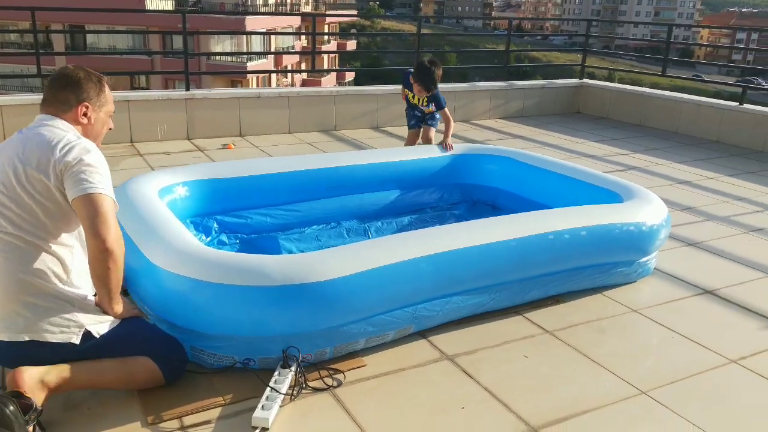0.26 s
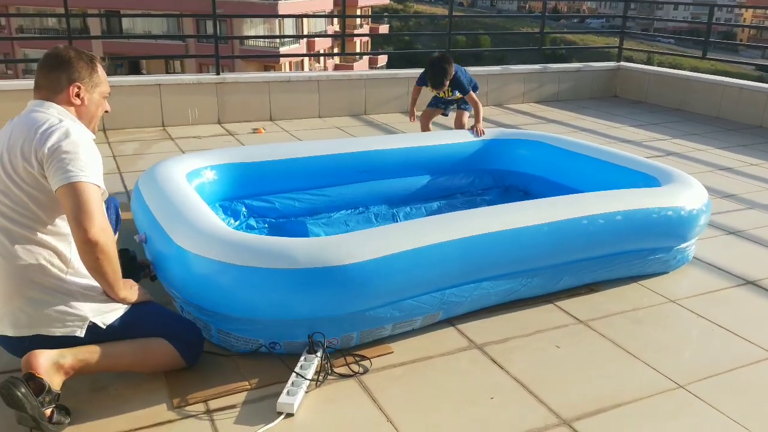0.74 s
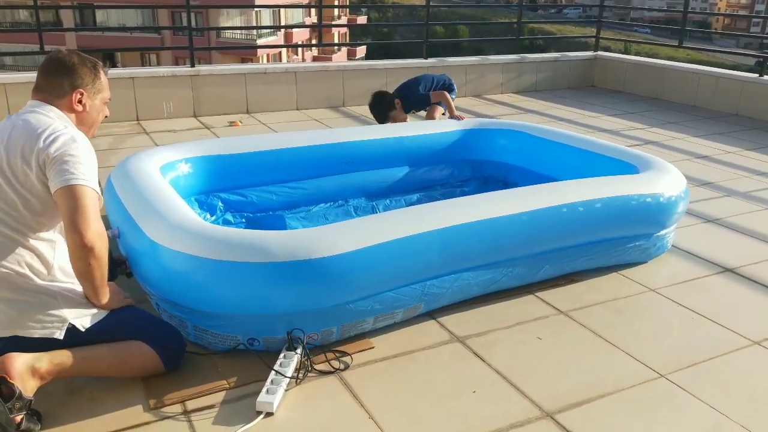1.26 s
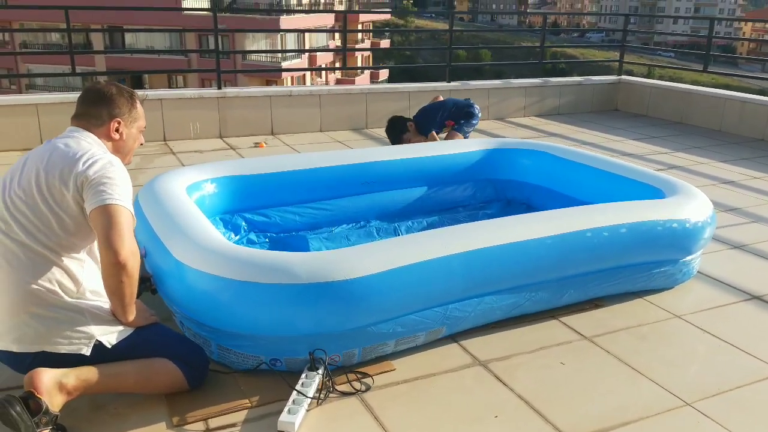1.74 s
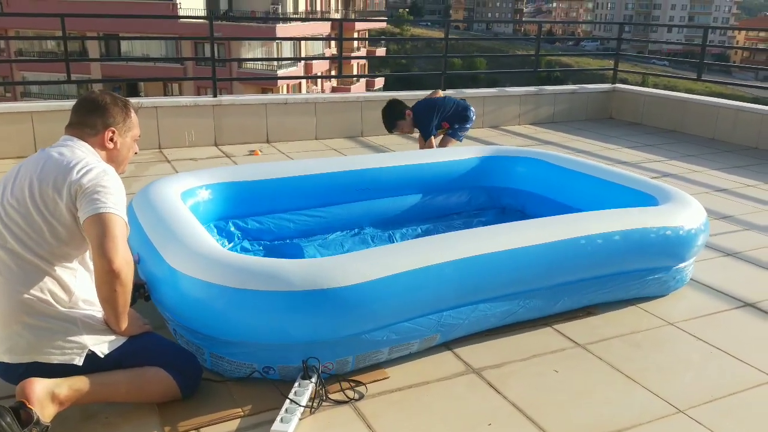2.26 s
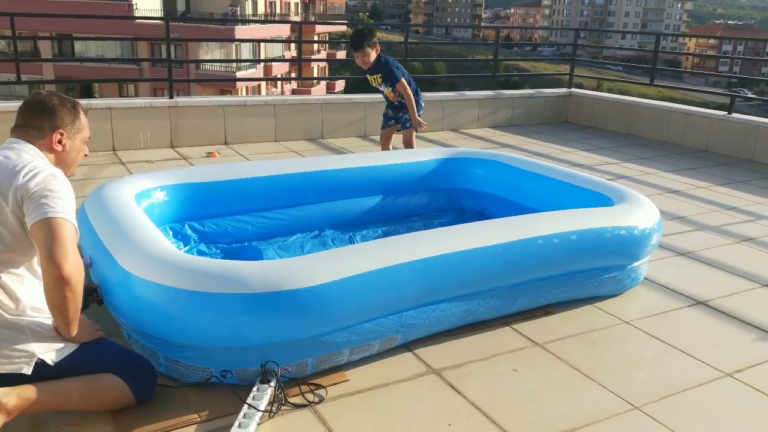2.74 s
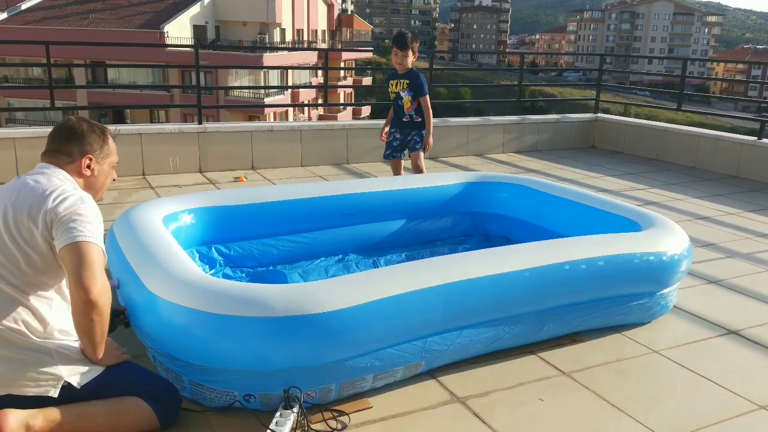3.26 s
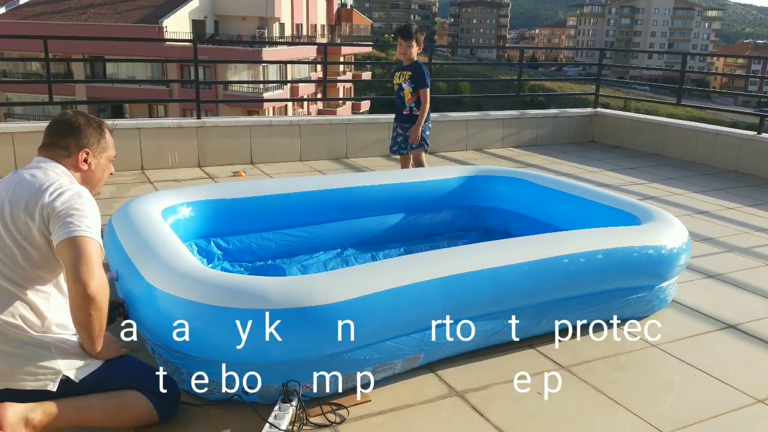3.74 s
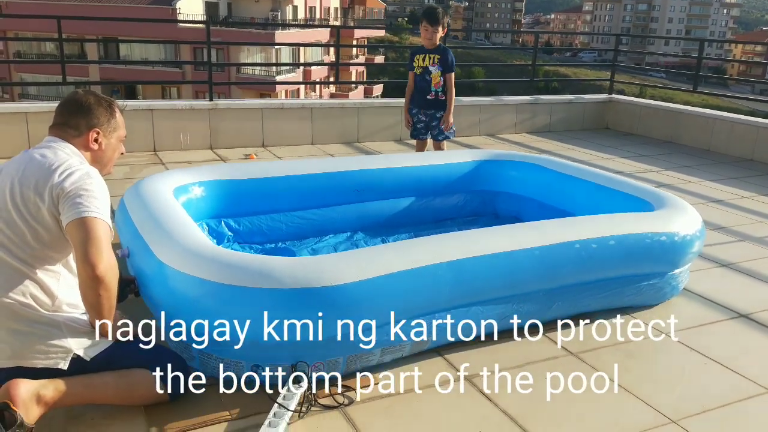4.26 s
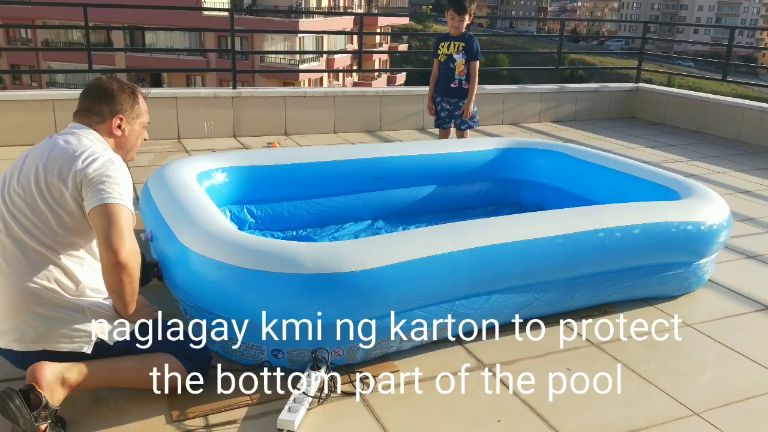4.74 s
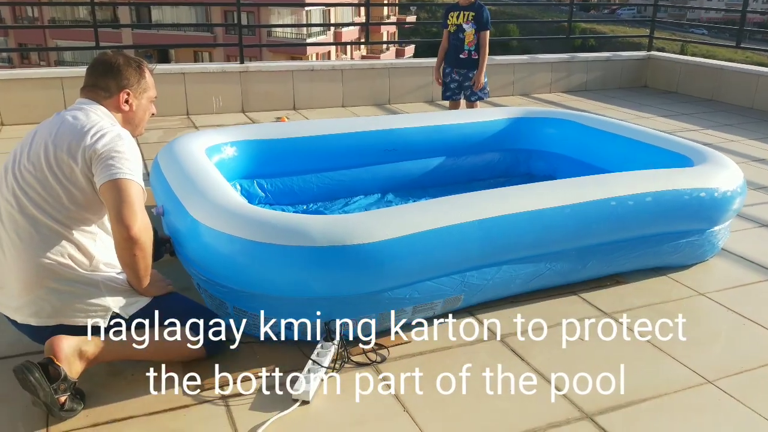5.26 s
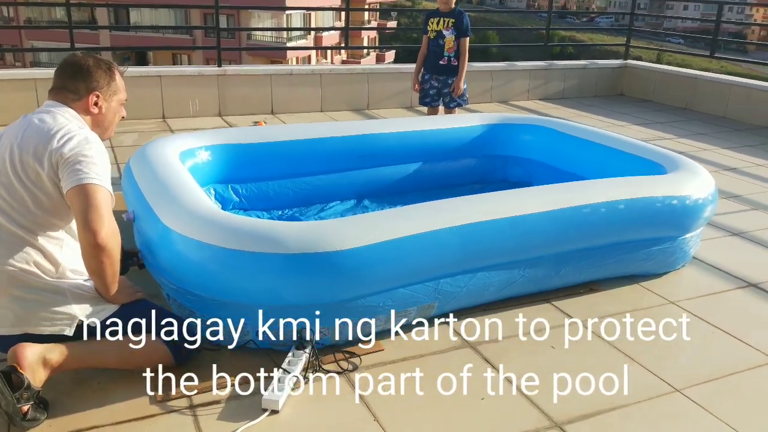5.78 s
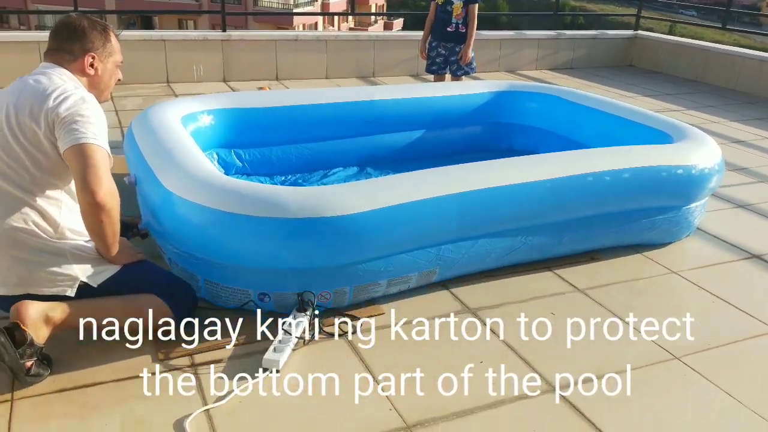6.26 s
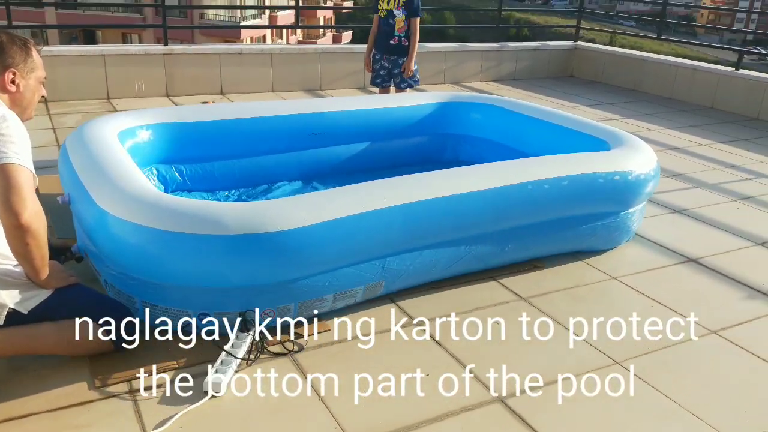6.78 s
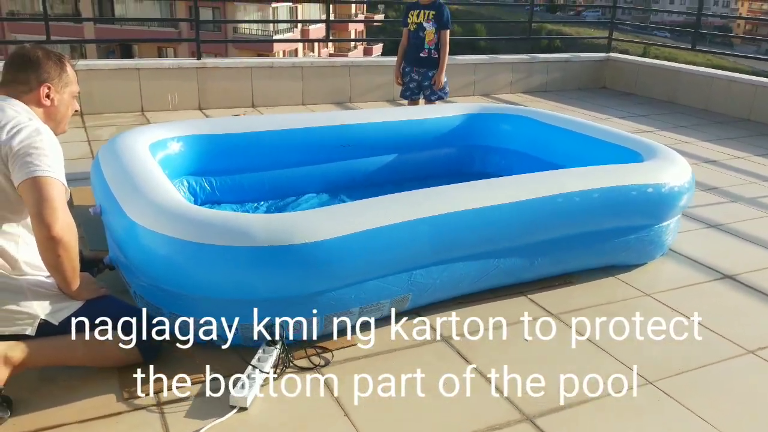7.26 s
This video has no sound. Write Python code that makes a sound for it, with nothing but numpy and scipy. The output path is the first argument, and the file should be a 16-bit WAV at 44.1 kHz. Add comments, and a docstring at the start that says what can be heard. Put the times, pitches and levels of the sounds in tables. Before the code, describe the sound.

An electric inflator runs without pause on an open terrace: low motor hum, piercing blade whine around three kilohertz, and rushing, hissing air. The whine swells and dips separately left and right as the handheld stereo microphone drifts. A soft vinyl knock comes early, then a sharp thump on the left microphone before midway; later the low rumble rises slightly.

```python
"""Open terrace, hand-held camera with two microphone ports: an electric air pump fills an inflatable pool.
From the start, sines at shaft orders hum, the ten-blade impeller whines and shaped noise rushes through pump,
hose and nozzle; the camera drifts through standing waves, so the whine swells and fades at each port.
At 1.2 s damped modes give a soft pool knock and low ring; at 2.87 s something bumps the left port, with two
rebounds, and the pool rings. A short low ring follows at 5.39 s; from 5.57 s the rumble steps up and stays."""
import sys
import numpy as np
from scipy import signal
from scipy.fft import rfft, irfft, next_fast_len
from scipy.io import wavfile
from scipy.ndimage import uniform_filter1d, map_coordinates

SR = 44100
rng = np.random.default_rng(int(sys.argv[2]) if len(sys.argv) > 2 else 0)


def dump_mix(stems):
    """Bounce the given channels to the path in sys.argv[1] as a 16-bit WAV at rate SR."""
    frames = np.atleast_2d(stems).T  # one column per channel
    limited = np.clip(frames, -1, 1)  # hard clip at full scale
    pcm = np.round(limited * 32767).astype(np.int16)
    wavfile.write(sys.argv[1], SR, pcm)


N = 331632  # samples, 7.52 s


def amp(db):
    """Decibels to gain."""
    return 10 ** (np.asarray(db) / 20)


def unit(x):
    """Scale to rms 1."""
    return x / np.sqrt(np.mean(x ** 2) + 1e-20)


def along(points, hz):
    """Read (Hz, value) points on a log frequency axis."""
    point_hz, value = np.transpose(points)
    return np.interp(np.log(hz + 1), np.log(point_hz + 1), value)


def curves(rows):
    """One value per sample for each column after the time."""
    time_s, *columns = np.transpose(rows)
    return [np.interp(np.arange(N) / SR, time_s, column) for column in columns]


def wobble(rate):
    """A smooth random curve, rate knots a second."""
    knots = rng.standard_normal(int(N * rate / SR) + 4)
    return map_coordinates(knots, [np.arange(N) * rate / SR])


def filtered(x, response):
    """x times a complex response of frequency."""
    size = next_fast_len(N + SR // 2)
    spectrum = rfft(x, size) * response(np.fft.rfftfreq(size, 1 / SR))
    return irfft(spectrum, size)[..., :N]


def pan(left_db):
    """Gains of the two ports for a left-right level difference."""
    return amp([[left_db / 2], [-left_db / 2]])


def tone(phase):
    """A sine of rms 1."""
    return np.sqrt(2) * np.sin(phase)


# Motor speed before its quick waver: time_s, shaft_hz
SHAFT_SPEED = [(0, 317.9), (.9, 318.9), (1.35, 318.8), (1.6, 318.5), (2.7, 318.35), (3.4, 318.65),
               (4.1, 318.75), (5.2, 319.15), (6.4, 319.5), (7.52, 319.3)]


def shaft_angle(waver_hz):
    """The shaft turns with a slight quick waver of speed; its angle in radians drives hum and whine."""
    shaft_hz = curves(SHAFT_SPEED)[0] + waver_hz * wobble(25.4)
    return 2 * np.pi * np.cumsum(shaft_hz) / SR


# Shaft hum reference, fading slowly until the camera comes lower: time_s, level_db (before a trim)
HUM_LEVEL = [(0, -41.5), (1.4, -44), (5.8, -45), (6.2, -42.5), (7.52, -44)]
# Shaft orders: multiple_of_shaft, level_db (against the hum), left_right_db, change_db (start to end)
SHAFT_ORDERS = [(1, -1.5, 4, -2), (2, -15, 10.5, -0.5), (3, -12.5, 3, -6), (5, -11, -3, -3),
                (7, -16, 9, -6), (11, -51, -4, 0), (12, -19, 0, 1)]


def motor(angle, flutter_db, trim_db=-1.5):
    """Unbalance hums once a turn, with weaker orders above it."""
    hum_db = curves(HUM_LEVEL)[0]
    progress = np.linspace(-.5, .5, N)
    out = np.zeros((2, N))
    for multiple, db, left_db, change_db in SHAFT_ORDERS:
        level_db = hum_db + db + change_db * progress + trim_db + flutter_db * wobble(22)
        start_phase = rng.uniform(0, 2 * np.pi)
        out += amp(level_db) * pan(left_db) * tone(round(multiple) * angle + start_phase)
    return out


def two_ports(left, right, lead):
    """Level and phase of a tone at both ports; the port nearer to a node takes most of the phase slip."""
    gain = amp(np.array(curves(left) + curves(right)))
    lead_rad = curves(lead)[0]
    left_share = gain[1] ** 2 / np.sum(gain ** 2, axis=0)
    left_phase = np.cumsum(np.diff(lead_rad, prepend=0) * left_share)
    return gain, np.array([left_phase, left_phase - lead_rad])


BLADES = 10
# Blade tone in the standing waves at the left port: time_s, level_db (before trim and flutter)
BLADE_TONE_LEFT = [(0, -38), (.15, -42), (.2, -55), (.27, -46), (.42, -34), (.58, -27), (.7, -24.5),
                   (.87, -31), (1.02, -26.5), (1.25, -31), (1.44, -37), (1.62, -30.5), (1.86, -25.8),
                   (1.94, -29), (2.03, -56), (2.1, -42), (2.17, -37), (2.23, -42.5), (2.42, -34),
                   (2.55, -40.5), (2.72, -34), (2.95, -33), (3.25, -41.5), (3.45, -33.5), (3.8, -36.5),
                   (4.17, -41), (4.3, -55), (4.36, -41), (4.75, -31.5), (5, -28.5), (5.26, -38.5),
                   (5.45, -36), (5.54, -46), (5.6, -38), (6.3, -32.5), (6.72, -40.5), (7.02, -41.5),
                   (7.13, -54), (7.2, -42.5), (7.43, -32.5), (7.52, -35)]
# Blade tone at the right port: time_s, level_db (before trim and flutter)
BLADE_TONE_RIGHT = [(0, -35), (.1, -30.5), (.4, -41), (.5, -40), (.58, -53), (.66, -34.5), (.8, -37),
                    (.88, -56), (.95, -35.5), (1.08, -29.5), (1.42, -37.5), (1.6, -40.5), (1.73, -29.3),
                    (1.85, -31), (1.94, -37), (2.06, -31), (2.25, -40), (2.39, -31.5), (2.9, -34),
                    (2.97, -43), (3.24, -35.5), (3.43, -42.5), (3.65, -36), (3.88, -37), (4.14, -38),
                    (4.25, -51), (4.36, -39.5), (4.58, -39.5), (4.7, -54), (5, -41), (5.23, -46),
                    (5.46, -35), (5.73, -37.5), (6.1, -28.5), (6.4, -36), (6.59, -55), (6.72, -41.5),
                    (6.8, -49), (6.88, -41), (7, -40.5), (7.06, -48), (7.3, -42), (7.52, -42)]
# How the whine's wave crosses the ports as the camera drifts: time_s, left_lead_rad (before scatter)
BLADE_TONE_LEAD = [(0, -3), (.16, -3.2), (.22, -7.4), (.6, -2.3), (.86, -.5), (.9, -2.8), (1.1, -2.6),
                   (1.29, -3.1), (1.43, -3.15), (1.6, -2.1), (1.78, -3), (2.1, -1), (2.27, 1.4),
                   (2.36, 1.7), (2.43, 3), (2.55, 1), (2.75, .1), (3.2, .5), (3.53, 1.4), (3.65, 2.8),
                   (3.78, 3.15), (3.91, 3.2), (4.08, 4.6), (4.28, 5.3), (4.33, 3.3), (4.5, 4.1), (4.7, 2),
                   (4.87, 1.4), (4.93, 3.7), (5.05, 4.6), (5.2, 2.5), (5.37, 1.6), (5.42, 3.1), (5.46, 3.1),
                   (5.62, -.2), (5.78, -.1), (6.05, -2.7), (6.3, -1.4), (6.5, -1.8), (6.62, -4.5),
                   (6.74, -3.1), (6.85, -.2), (7.1, -.2), (7.15, -2), (7.52, -3.5)]
# Thin side tones riding on the whine: above_blade_tone_hz, level_db (against it, before flutter)
SIDE_TONES = [(1405, -36), (3889, -25), (5200, -45), (5297, -33), (7779, -29.5), (9092, -42.5),
              (9186, -35.5)]
# Octave of the blade tone at the left port: time_s, level_db (before trim and flutter)
BLADE_OCTAVE_LEFT = [(0, -46), (.35, -68), (1.3, -53), (2.35, -49), (2.6, -55), (2.97, -55), (3.3, -62),
                     (3.9, -50), (4.33, -50), (4.65, -54), (4.87, -84), (5.1, -57), (6.7, -62),
                     (6.93, -51.5), (7.2, -47), (7.4, -72)]
# The octave at the right port: time_s, level_db (before trim and flutter)
BLADE_OCTAVE_RIGHT = [(0, -54), (1.05, -47), (1.4, -77), (1.9, -65), (2.23, -57), (2.7, -66), (3.4, -46),
                      (3.9, -58), (4.68, -50), (4.85, -43.5), (5.18, -41), (5.48, -53), (5.78, -43),
                      (6.12, -70), (6.4, -41.5), (6.78, -50), (7.08, -40), (7.38, -47), (7.52, -42)]
# How the octave's wave crosses the ports: time_s, left_lead_rad
BLADE_OCTAVE_LEAD = [(4.8, -3.1), (5, -.4), (5.75, -.7), (6.05, -2.5), (6.6, -3.6), (6.9, -2), (7.2, -1.7),
                     (7.45, -2.9)]


def impeller(angle, whine_db, flutter_db, scatter, thin_rough, octave_db, octave_flutter_db):
    """Blades chop the air into a whine; tiles and wall reflect it, so each port passes its own sharp nodes."""
    t = np.arange(N) / SR
    ports = lambda rate: np.array([wobble(rate), wobble(rate)])  # independent at the two ports

    gain, phase = two_ports(BLADE_TONE_LEFT, BLADE_TONE_RIGHT, BLADE_TONE_LEAD)
    level = gain * amp(whine_db + flutter_db * wobble(34))
    blade_phase = BLADES * angle + phase + scatter * ports(140)
    thin = np.zeros((2, N))
    for above_hz, db in SIDE_TONES:
        thin_level = amp(db + 1.7 * wobble(18))
        thin_phase = blade_phase + 2 * np.pi * above_hz * t + thin_rough * ports(320)
        thin += thin_level * tone(thin_phase)

    gain, phase = two_ports(BLADE_OCTAVE_LEFT, BLADE_OCTAVE_RIGHT, BLADE_OCTAVE_LEAD)
    octave_level = gain * amp(octave_db + octave_flutter_db * ports(5.7))
    octave = octave_level * tone(2 * BLADES * angle + phase)
    return level * (tone(blade_phase) + thin) + octave


# Likeness of the air noise at the two ports: frequency_hz, coherence (0 to 1)
PORT_COHERENCE = [(50, 0.97), (300, 1), (700, 0.34), (1400, 0.55), (2200, 0.24), (3500, 0.1), (6000, 0.064),
                  (12000, 0.097)]


def rush(spectrum, lag_ms, patchy_db):
    """Turbulent stereo noise of rms 1, uneven in time and pitch, that reaches the left port late."""
    noise = signal.stft(rng.standard_normal((2, N)), nperseg=512)[2]
    field = uniform_filter1d(rng.standard_normal(noise.shape[1:]), size=5, axis=0)
    field = uniform_filter1d(field, size=12, axis=1)
    pair = signal.istft(noise * amp(patchy_db * unit(field)), nperseg=512)[1][:, :N]

    # shares of a common and an opposed part that give the coherence
    turn = lambda hz: np.arccos(np.clip(along(PORT_COHERENCE, hz), -1, 1)) / 2
    shape = lambda hz: amp(along(spectrum, hz)) * [np.cos(turn(hz)), np.sin(turn(hz))]
    mid, side = filtered(pair, shape)
    delay_s = np.array([[.5], [-.5]]) * lag_ms / 1000
    return unit(filtered(np.array([mid + side, mid - side]), lambda hz: np.exp(-2j * np.pi * hz * delay_s)))


# Noise spectra, only their shape counts: frequency_hz, density_db (per Hz)
RUMBLE_SPECTRUM = [(20, -42), (45, -12), (85, -0.5), (150, -1), (260, -0.5), (400, -6.5), (600, -5),
                   (1000, -13.5), (1600, -55)]
# Air in the pump housing: frequency_hz, density_db (per Hz)
HOUSING_SPECTRUM = [(30, -21.5), (200, -24.5), (450, -14), (620, -16), (705, -5), (800, -11), (900, -4),
                    (1050, -8.5), (1180, -4.5), (1320, -1.5), (1500, 2.5), (1680, -2.5), (1810, -7),
                    (2000, -37), (2600, -72)]
# Roar at the outlet: frequency_hz, density_db (per Hz)
OUTLET_SPECTRUM = [(1850, -30), (2000, 3), (2090, 5), (2220, 10), (2330, -2), (2450, -5), (2700, -56)]
# Air in the duct: frequency_hz, density_db (per Hz)
DUCT_SPECTRUM = [(1550, -20), (1750, 0.5), (1815, -1), (1900, 4), (2050, 0), (2350, -4), (2480, -4.5),
                 (2650, -1.5), (2840, -2), (3030, -7.5), (3250, -3), (3420, -29), (4000, -72)]
# Resonance of the hose: frequency_hz, density_db (per Hz)
HOSE_SPECTRUM = [(1450, -24), (1690, -3), (1830, -0.5), (1970, 1), (2150, -18)]
# Hiss at the valve: frequency_hz, density_db (per Hz)
VALVE_SPECTRUM = [(3200, -17), (3550, -22.5), (3850, 0.5), (4200, -2.5), (4600, -0.5), (5000, 1),
                  (5400, -2), (6200, -41)]
# Hiss at the nozzle: frequency_hz, density_db (per Hz)
NOZZLE_SPECTRUM = [(2800, -26), (3600, -49), (4400, -20), (5000, -6.5), (5500, -0.5), (5870, 4),
                   (6500, -2.5), (7000, -8.5), (7450, -35), (8600, -29), (9800, -11), (10600, -32.5),
                   (13000, -71)]
# Air noise as the camera drifts: time_s, housing_db (before a trim), outlet_db (only its rise and fall is used)
HOUSING_OUTLET_LEVEL = [(0.1, -43, -45.5), (3.05, -41, -41.5), (3.13, -41.5, -43.5), (4.89, -43, -41),
                        (5.52, -41.5, -40.5), (7.2, -48, -48.5), (7.45, -45.5, -49)]
# Duct noise as the camera drifts: time_s, level_db
DUCT_DRIFT = [(0, -39), (5.3, -38), (6.1, -40.5), (7.52, -38.5)]
# Hose resonance, heard more as the camera drifts: time_s, level_db
HOSE_DRIFT = [(0, -53), (1.5, -58.5), (3.5, -54.5), (5.3, -50.5), (6.4, -52.5), (7.52, -48.5)]
# Hiss as the camera drifts: time_s, valve_db, nozzle_db (both before a slight flutter)
HISS_LEVEL = [(0, -49, -44), (1.0, -49, -43), (2.2, -48.5, -43), (3.1, -47, -43.5), (4.5, -47, -44.5),
              (5.4, -47.5, -42.5), (7.45, -48, -43)]
OUTLET_DB, OUTLET_SWING = -41, 1.34  # mean level in dB, factor on the rise and fall
# the low rumble steps up once
RUMBLE_DB, RUMBLE_RISE_DB, RUMBLE_RISE_AT_S, RUMBLE_RISE_S = -51, 3.5, 5.57, 0.43


def airflow():
    """Air roars in housing, duct, outlet and hose, hisses at valve and nozzle and rumbles low."""
    risen = np.clip((np.arange(N) / SR - RUMBLE_RISE_AT_S) / RUMBLE_RISE_S, 0, 1)
    rumble_level = amp(RUMBLE_DB + RUMBLE_RISE_DB * risen)
    rumble = rumble_level * pan(0.36) * rush(RUMBLE_SPECTRUM, lag_ms=0.025, patchy_db=1.5)

    housing_db, outlet_db = curves(HOUSING_OUTLET_LEVEL)
    housing = amp(housing_db + 4.0) * pan(1) * rush(HOUSING_SPECTRUM, lag_ms=0.2, patchy_db=1.33)
    outlet_level = amp(OUTLET_DB + OUTLET_SWING * (outlet_db - outlet_db.mean()))
    outlet = outlet_level * pan(0) * rush(OUTLET_SPECTRUM, lag_ms=0.12, patchy_db=1.5)

    duct_level, hose_level = amp(curves(DUCT_DRIFT)[0]), amp(curves(HOSE_DRIFT)[0])
    duct = duct_level * pan(0.53) * rush(DUCT_SPECTRUM, lag_ms=0.18, patchy_db=1.5)
    hose = hose_level * pan(0.42) * rush(HOSE_SPECTRUM, lag_ms=0.188, patchy_db=2.9)

    valve_db, nozzle_db = curves(HISS_LEVEL)
    valve_level, nozzle_level = amp(valve_db + 0.23 * wobble(13)), amp(nozzle_db + 0.22 * wobble(7.6))
    valve = valve_level * pan(-0.21) * rush(VALVE_SPECTRUM, lag_ms=0.17, patchy_db=2.5)
    nozzle = nozzle_level * pan(0.4) * rush(NOZZLE_SPECTRUM, lag_ms=0.17, patchy_db=2.0)
    return rumble + housing + outlet + duct + hose + valve + nozzle


# Narrow housing resonances in the airflow: pitch_hz, width_hz, start_db, midway_db, end_db
HOUSING_RESONANCES = [(245, 20, -75, -69, -55), (432, 5, -63, -63, -68), (703, 10, -53, -60, -58),
                      (875, 30, -69, -59, -65), (1492, 22, -54, -54, -60), (2060, 22, -68, -56, -53),
                      (2229, 24, -55, -52, -56), (2710, 34, -61, -59, -70), (2875, 12, -74, -62, -56),
                      (4592, 8, -67, -67, -67), (10273, 8, -76, -72, -70)]


def singing(apart):
    """Turbulence drives the narrow resonances into fuzzy tones, partly different at the two ports."""
    t = np.arange(N) / SR

    def fuzzy(hz, width_hz):
        """A tone with randomly wandering sine and cosine parts, rms 1."""
        sine = wobble(2 * width_hz) * np.sin(2 * np.pi * hz * t)
        cosine = wobble(2 * width_hz) * np.cos(2 * np.pi * hz * t)
        return unit(sine + cosine)

    out = np.zeros((2, N))
    for hz, width_hz, *level_db in HOUSING_RESONANCES:
        level = amp(np.interp(t, [0, t[-1] / 2, t[-1]], level_db))
        common = fuzzy(hz, width_hz)
        separate = np.array([fuzzy(hz, width_hz), fuzzy(hz, width_hz)])
        out += level * unit(common + apart * separate)
    return out


def ring(modes, t, attack, tilt_db=0, share=1):
    """Damped modes ring from t = 0; tilt_db per octave lifts the upper ones, a resting touch shortens them."""
    t = np.maximum(t, 0)
    lowest_hz = modes[0][0]
    out = np.zeros(N)
    for hz, db, t60 in modes:
        level_db = db + tilt_db * np.log2(hz / lowest_hz) - 60 * t / (t60 * share)
        out += amp(level_db) * np.sin(2 * np.pi * hz * t)
    return (1 - np.exp(-t / attack)) * out


# Soft contacts with the pool: start_s, knock_db, ring_db, ring_tilt_db (per octave),
# ring_share (of the free ring time left by the touch)
POOL_CONTACTS = [(1.2, -23, -58, 44, .7), (1.226, -34, -70, 44, .5), (2.925, -60, -48, -8, 1),
                 (5.385, -60, -40, -8, .15)]
# Modes of the taut vinyl wall: pitch_hz, level_db (within the knock), t60_s
VINYL_WALL = [(370, -10, 0.03), (473, -2, 0.017), (595, -5, 0.02), (1140, -5, .01)]
# Modes of the air chambers, the two lowest beating slowly: pitch_hz, level_db (before tilt), t60_s (free)
AIR_CHAMBER = [(101.2, 0, 2.5), (102.9, -2, 2.5), (161, -12, .7)]


def pool():
    """A nudge makes the vinyl knock briefly and the air chamber ring on."""
    t = np.arange(N) / SR
    out = np.zeros(N)
    for start_s, knock_db, ring_db, tilt_db, share in POOL_CONTACTS:
        out += amp(knock_db) * ring(VINYL_WALL, t - start_s, attack=0.00091)
        chamber = ring(AIR_CHAMBER, t - start_s, attack=0.047, tilt_db=tilt_db, share=share)
        out += amp(ring_db) * chamber
    return pan(4.2) * out


# A touch at the left microphone port and its rebounds: release_at_s, level_db, let_go_ms (suction's release)
PORT_TOUCHES = [(2.873, -10.3, .1), (2.8862, -25.5, .2), (2.8965, -33, .4)]


def port_bumps(build, release, sway_hz, sway_db):
    """A touch at the left port: suction builds, lets go at once and the pressure swings back to rest."""
    out = np.zeros(N)
    for release_at_s, db, let_go_ms in PORT_TOUCHES:
        t = np.arange(N) / SR - release_at_s
        snap = np.tanh(1000 * t / let_go_ms)  # from suction to pressure
        before = np.exp(-np.abs(t) / build) * np.cos(np.pi / 2 * t / build)
        after = np.exp(-np.abs(t) / release)
        push = snap * np.where(t < 0, before, after)
        sway = amp(sway_db) * ring([(sway_hz, 0, .13)], t, attack=0.0018)
        out += amp(db) * (push + sway)
    return amp([[0], [-36]]) * out  # 36 dB weaker at the right port


def scene():
    """Pump, pool and the bump at the microphone."""
    angle = shaft_angle(waver_hz=0.063)
    hum = motor(angle, flutter_db=1.15)
    whine = impeller(angle, whine_db=3.0, flutter_db=1.0, scatter=0.093, thin_rough=0.12,
                     octave_db=0.7, octave_flutter_db=2.5)
    air = airflow() + singing(apart=0.68)
    bumps = port_bumps(build=0.0038, release=0.0032, sway_hz=96, sway_db=-14.0)
    return hum + whine + air + pool() + bumps


TOP_HZ = 13100


def record(dry):
    """The camera keeps nothing above its band limit."""
    return filtered(dry, lambda hz: hz < TOP_HZ)


dry = scene()
out = record(dry)
dump_mix(out)
```